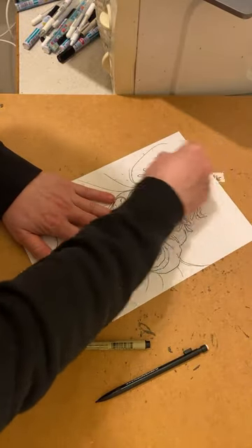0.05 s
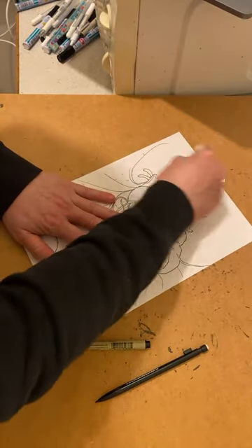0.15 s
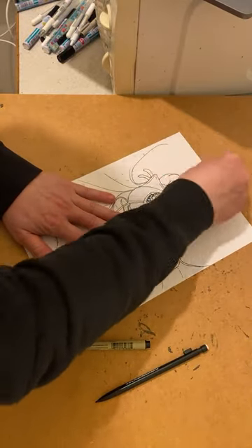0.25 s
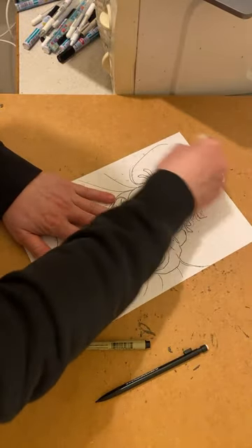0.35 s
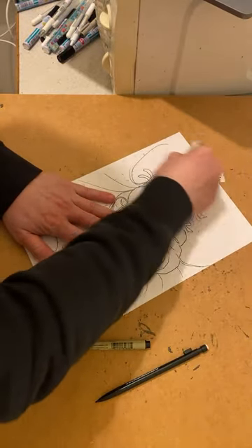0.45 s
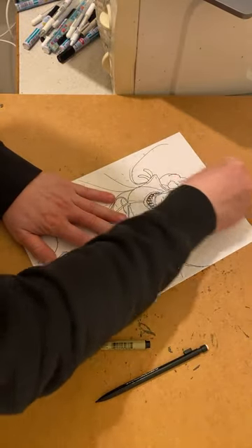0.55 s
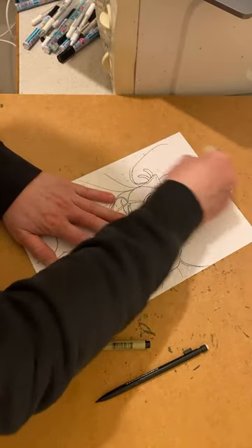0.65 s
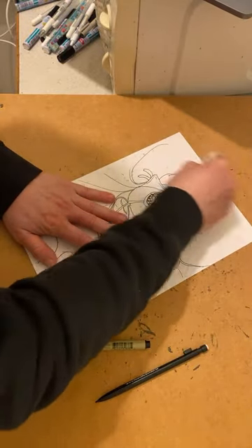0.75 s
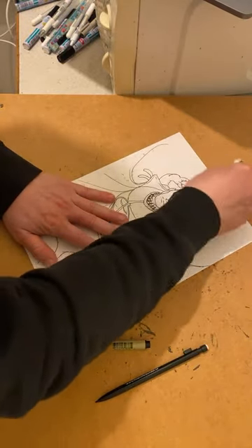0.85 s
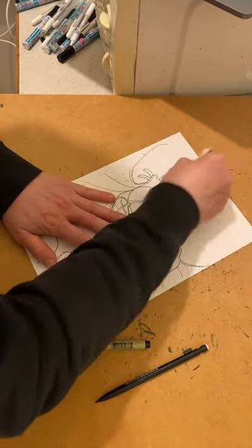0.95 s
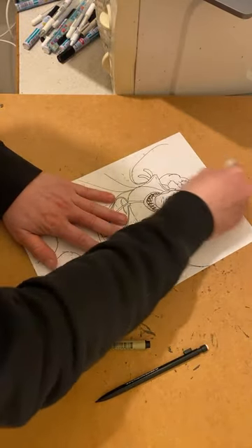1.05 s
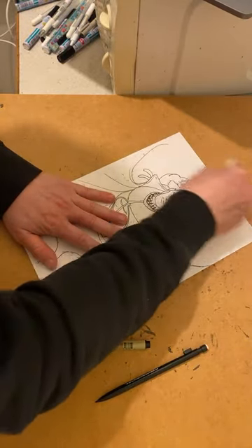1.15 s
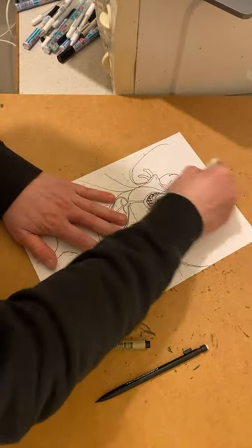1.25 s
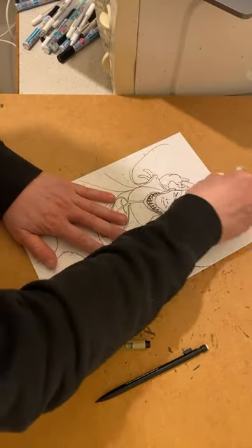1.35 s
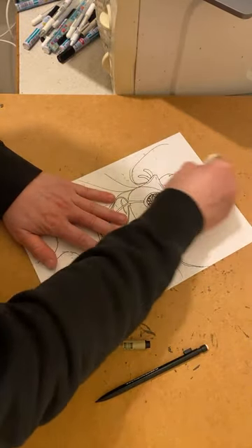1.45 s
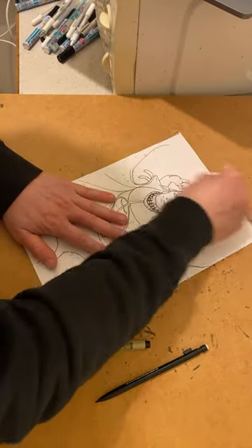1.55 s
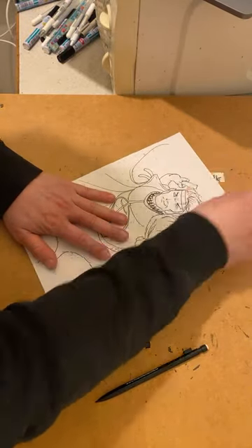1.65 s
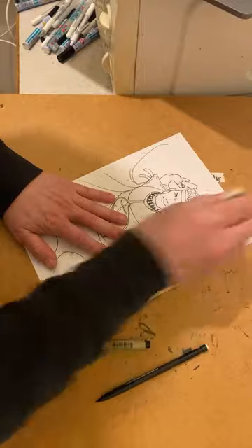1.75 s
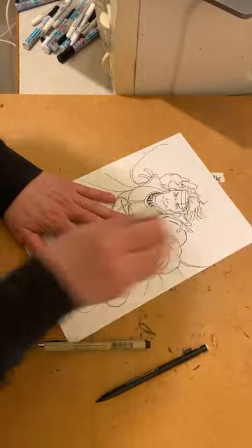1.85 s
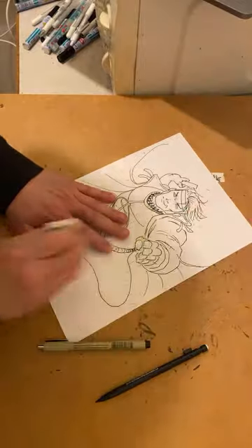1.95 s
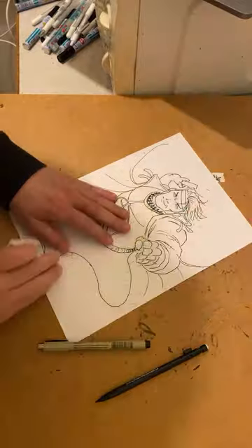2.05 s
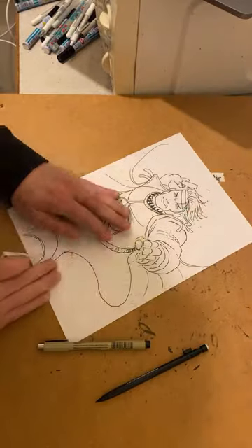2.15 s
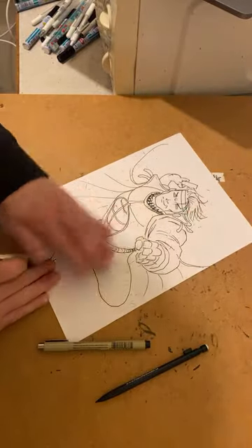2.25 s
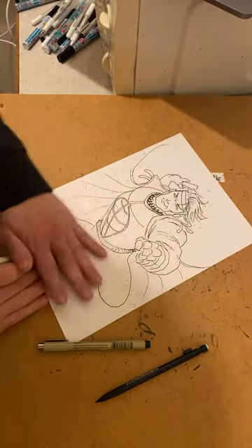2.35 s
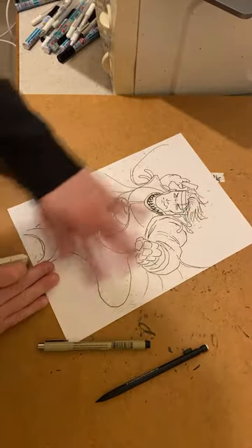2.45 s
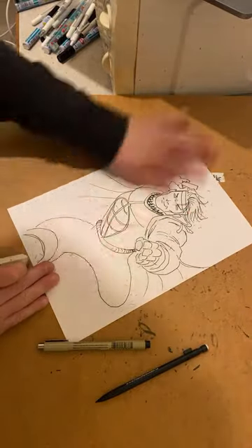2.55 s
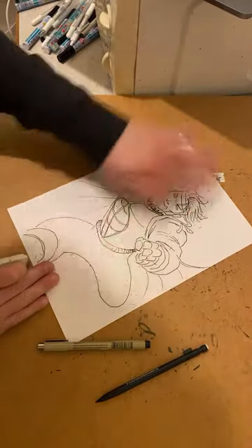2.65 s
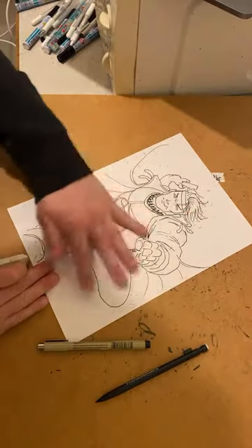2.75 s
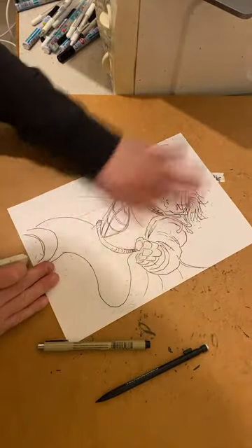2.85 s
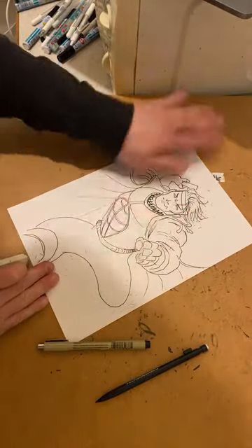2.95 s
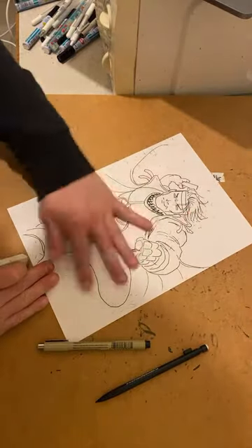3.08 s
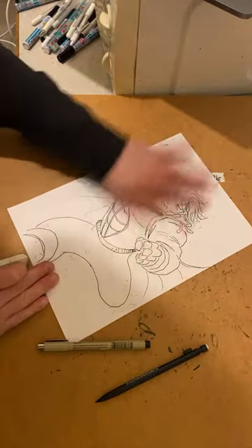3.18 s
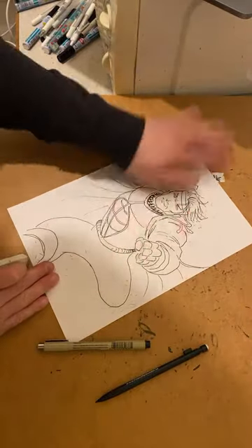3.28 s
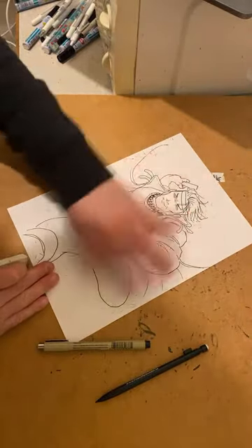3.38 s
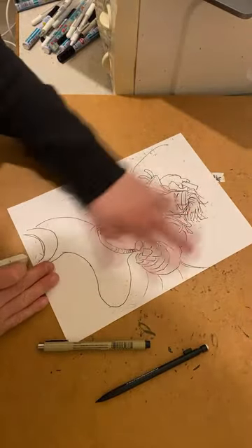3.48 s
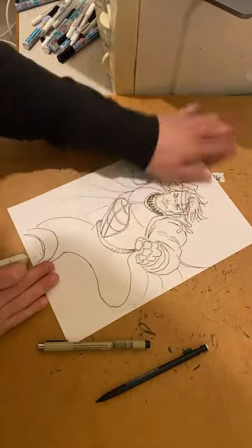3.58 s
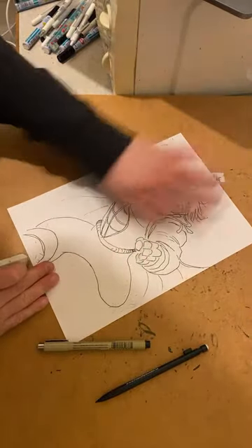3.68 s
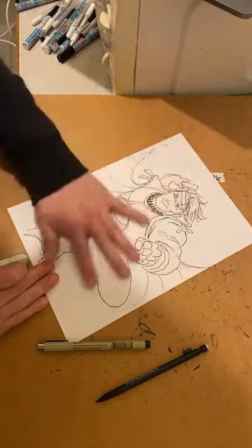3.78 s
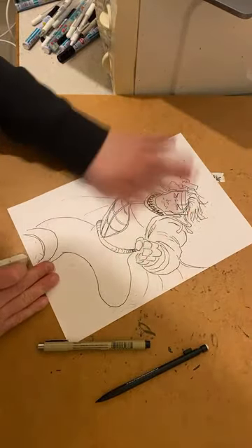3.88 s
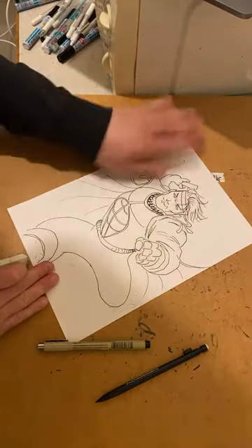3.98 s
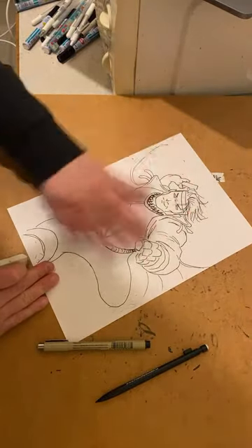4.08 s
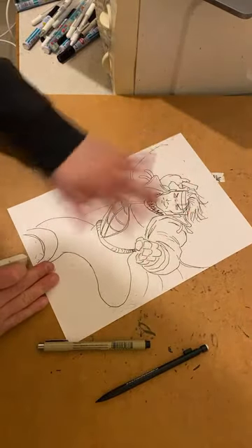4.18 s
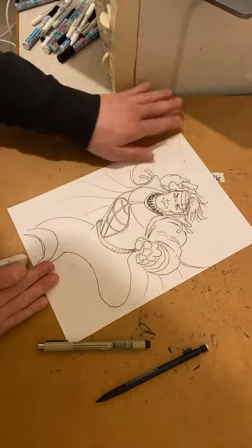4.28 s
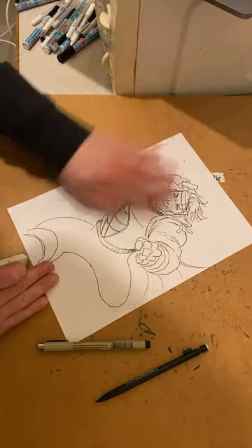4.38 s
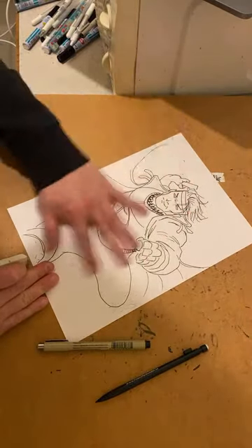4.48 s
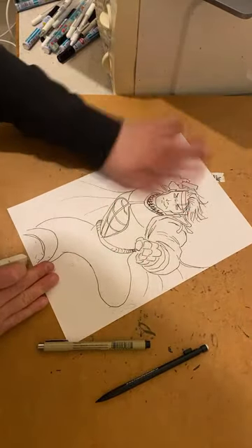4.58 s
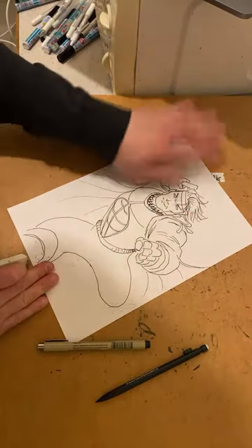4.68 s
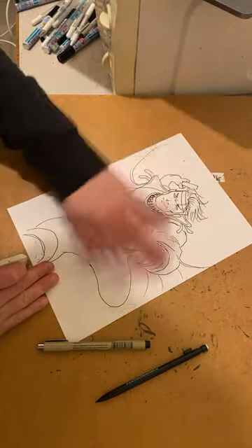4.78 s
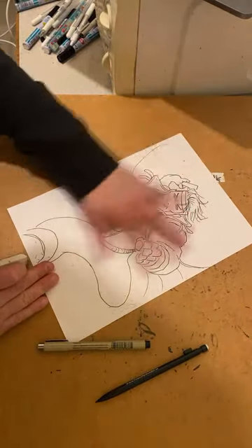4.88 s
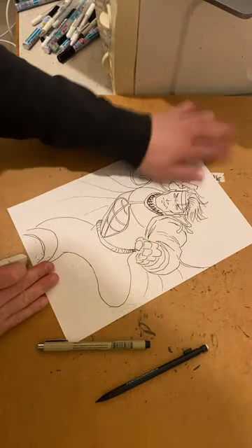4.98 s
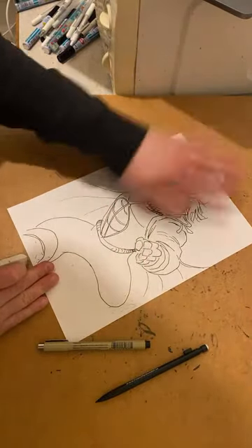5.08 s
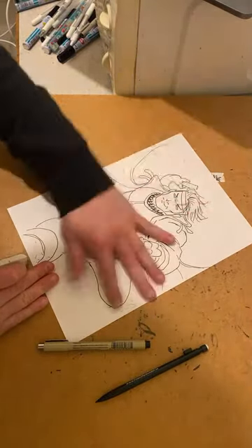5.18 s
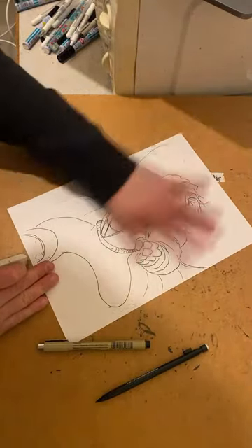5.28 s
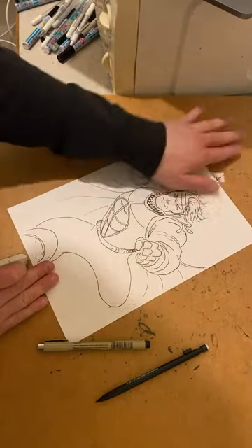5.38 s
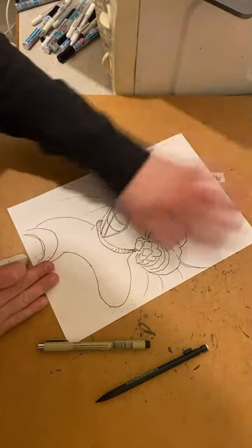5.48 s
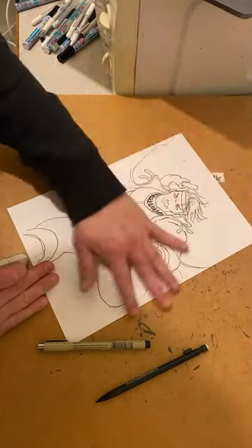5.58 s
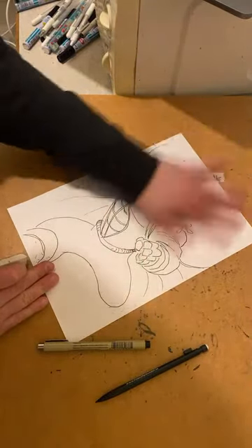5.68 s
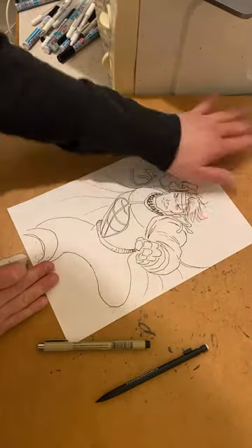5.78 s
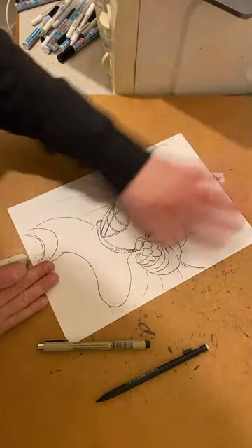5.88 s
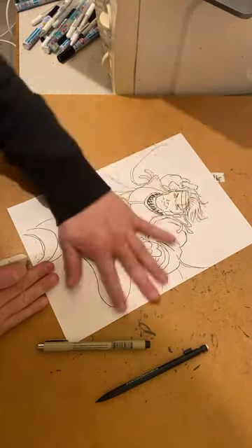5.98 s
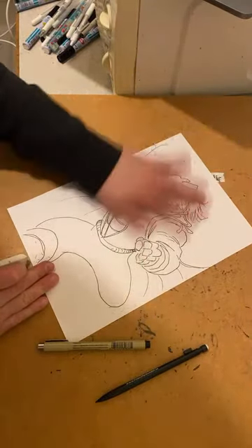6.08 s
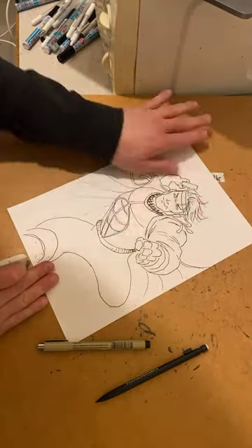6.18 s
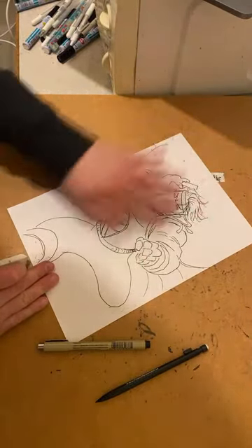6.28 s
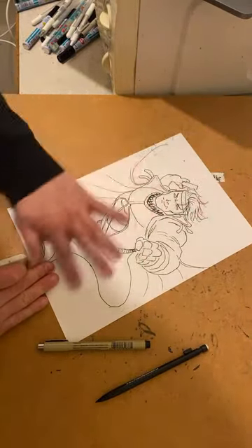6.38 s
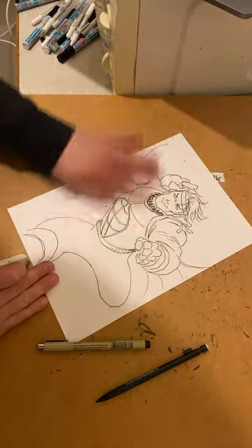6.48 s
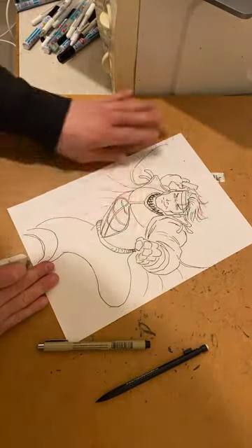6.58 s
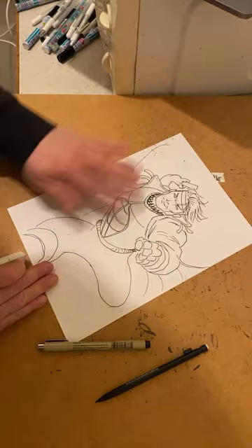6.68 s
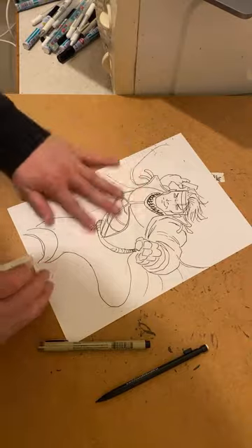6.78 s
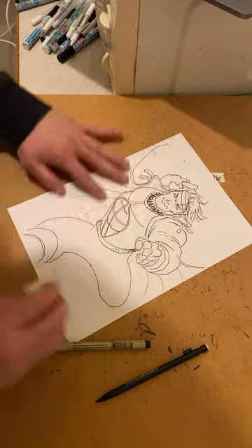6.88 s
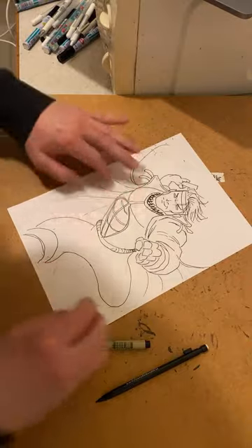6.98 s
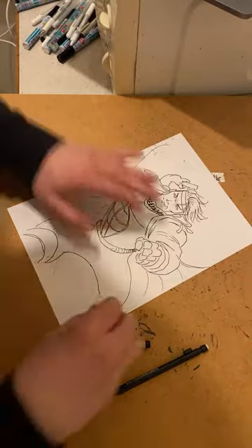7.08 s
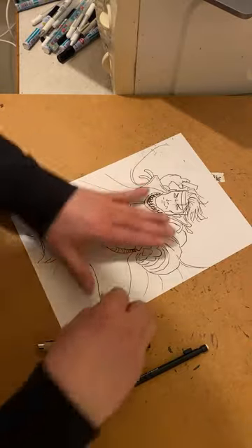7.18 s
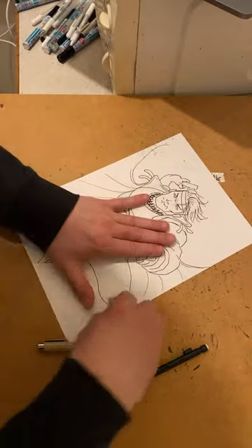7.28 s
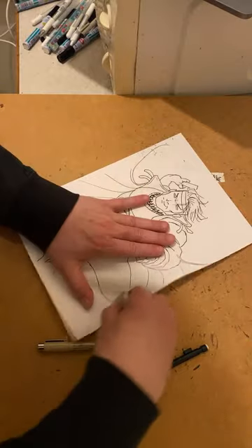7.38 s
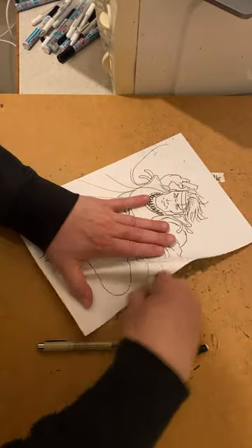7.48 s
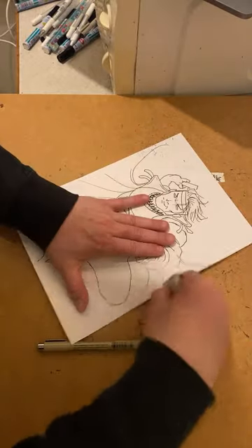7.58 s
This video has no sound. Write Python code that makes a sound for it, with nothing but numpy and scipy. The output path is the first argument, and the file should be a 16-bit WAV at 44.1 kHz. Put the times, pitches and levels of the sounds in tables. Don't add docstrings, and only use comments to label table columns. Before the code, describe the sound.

An eraser knocks hard and drags over paper on a hollow wooden desk six times, then a hand sweeps the sheet repeatedly and the paper crackles.

```python
import sys
import numpy as np
from scipy import signal
from scipy.fft import rfft, irfft, next_fast_len
from scipy.io import wavfile
from scipy.ndimage import uniform_filter1d

SR = 44100
rng = np.random.default_rng(int(sys.argv[2]) if len(sys.argv) > 2 else 0)


def to_wav(s):
    ch = np.atleast_2d(s).T
    pcm = np.round(np.clip(ch, -1, 1) * 32767)
    wavfile.write(sys.argv[1], SR, pcm.astype(np.int16))


def undo_db(level):
    steps = np.asarray(level, float) / 20
    return 10 ** steps


N = 336432

# (time [s], blow [dB], deep modes [dB], bright modes [dB], echo [dB])
RUBBER_BLOWS = [
    (0.124, -17, -26.5, -18.5, -2.5),
    (0.462, -18, -23.5, -17.5, -2.5),
    (0.749, -18, -26, -17, -3),
    (1.017, -14.5, -26, -14.5, -4),
    (1.267, -16.5, -26.5, -17.5, -4),
    (1.541, -19.5, -24, -18.5, -1.5),
]
# (time [s], blow [dB], deep modes [dB], bright modes [dB], echo [dB])
HAND_BLOWS = [(2.214, -52.5, -6, -24, 6.5), (2.825, -35, -11, -23, 3), (2.834, -30.5, -21, -30, -17),
              (3.131, -42.5, -26, -29, -8), (3.151, -36, -12, -26, -4), (3.483, -38, -8.5, -14, 4.5),
              (3.818, -30.5, -15.5, -17.5, -1), (4.178, -38.5, -10.5, -14.5, 0),
              (4.512, -49.5, -4.5, -17.5, 9.5), (4.879, -38.5, -13, -23.5, 4.5),
              (5.244, -43.5, -11.5, -18, 8.5), (5.275, -39.5, -10, -12, -0.5),
              (5.656, -37.5, -6.5, -14, -0.5), (6.028, -41, -5, -11.5, -21), (6.048, -36.5, -6, -16, 0.5),
              (6.425, -54, -0.5, -30, 9.5), (6.459, -46.5, -7, -8, -0.5), (6.81, -28.5, -19.5, -21.5, -3),
              (7.312, -49, -4.5, -16, 4), (7.349, -26.5, -25, -20, 0)]
# (frequency [Hz], level [dB], t60 [s])
BOARD_MODES = [(280.7, -5, 0.059), (337, 1, 0.064), (450, 0.5, 0.096), (547, -5.5, 0.049),
               (658, -14.5, 0.14)]
# (frequency [Hz], level [dB], t60 [s])
PALM_MODES = [(258, -7.5, 0.041), (313, 1.4, 0.077), (450.5, -2.5, 0.059), (587, -6.5, 0.041),
              (780, -3.5, 0.022)]


def landings():
    out = np.zeros(N + SR)
    usual_walls = tail()
    for s, *levels in RUBBER_BLOWS:
        walls = 0.7 * usual_walls + 0.7 * tail()
        knock = landing(*levels, BOARD_MODES, 1.2, 0.00006, walls)
        out[round((s - 0.0022) * SR):][:len(knock)] += knock
    for s, *levels in HAND_BLOWS:
        knock = landing(*levels, PALM_MODES, 1.0, 0.00192, tail())
        out[round((s - 0.003) * SR):][:len(knock)] += knock
    return colour(out, lambda hz: hz ** 2 / (hz ** 2 + 29.0 ** 2))[:N]


# (frequency [Hz], level [dB], t60 [s])
DEEP_MODES = [(86, -12, 0.18), (117.1, -10, 0.52), (155.3, -0.5, 0.13)]
# (frequency [Hz], level [dB], t60 [s])
BRIGHT_MODES = [(817, 2.5, 0.0098), (1160, 0.5, 0.016), (1337, -7, 0.026), (1484, 1.5, 0.011),
                (1770, -5.5, 0.012), (2237, 3.5, 0.0056), (2830, -6.5, 0.0074)]
# (delay [s], gain of the board's ring [1])
BOARD_ARRIVALS = [(.001, -.8), (.0078, -.82), (.0122, -.32), (.0156, .46), (.0213, 1.), (.0288, -.35),
                  (.0405, -.35)]
# (delay [s], gain [1])
EDGE_ARRIVALS = [(.002, .35), (.0074, -1.8), (.0102, -.32), (.0135, .25), (.0181, -.35), (.0218, -.3),
                 (.0249, -.25), (.0298, .3), (.037, -.2)]


def landing(db, deep_db, bright_db, echo_db, board, push_ms, scatter_s, walls):
    deep_push = pushes([(0.00081, 1)], 5.57, 0)
    deep = undo_db(deep_db + 23.0) * signal.fftconvolve(deep_push, rings(DEEP_MODES, 0.009))
    top = signal.fftconvolve(pushes(BOARD_ARRIVALS, push_ms, scatter_s), rings(board, 0.001))
    edge = undo_db(bright_db + 12) * rings(BRIGHT_MODES, 0.0006)
    bright = signal.fftconvolve(pushes(EDGE_ARRIVALS, 0.51, 0.0001 + scatter_s), edge)
    board_push = pushes([(0.00026, 0.91)], push_ms, 0)
    thud = undo_db(5.0) * signal.fftconvolve(board_push, rings(board, 0.0015, 0.38))
    thud += undo_db(3.5) * signal.fftconvolve(pushes([(0.00023, 0.98)], 0.36, 0), edge)
    far = signal.fftconvolve(undo_db(-3.0) * deep + thud, walls)[:len(top)]
    return undo_db(db - 4.5) * (deep + top + bright + undo_db(echo_db) * far)


def pushes(arrivals, ms, scatter_s):
    force = np.zeros(SR // 16)
    push = np.hanning(round(ms * SR / 1000) + 2)
    push /= push.sum()
    for (after, gain), chance in zip(arrivals, rng.standard_normal(len(arrivals))):
        moved = after + scatter_s * chance * (after > 0)
        force[abs(round(moved * SR)):][:len(push)] += gain * push
    return force


def rings(modes, rise_s, share=1):
    t = np.arange(SR // 2) / SR
    tones = np.zeros(len(t))
    for k, (hz, db, t60) in enumerate(modes):
        tones += (-1) ** k * undo_db(db - 60 * t / (share * t60)) * np.sin(2 * np.pi * hz * t)
    return tones * (1 - np.exp(-t / rise_s)) ** 2


# (time after the blow [s], level [dB])
ECHO_DECAY = [(0., -1), (.025, -2.5), (.05, -5), (.108, -11), (.114, -14), (.21, -22.5), (.225, -25.5),
              (.45, -42)]
# (frequency [Hz], level [dB])
ECHO_COLOUR = [(60, -34), (150, -1.2), (400, 2.6), (1200, 1), (3000, 0), (16000, -10)]


def tail():
    t = np.arange(round(ECHO_DECAY[-1][0] * SR)) / SR
    noise = colour(rng.standard_normal(SR // 2), lambda hz: undo_db(read(ECHO_COLOUR, hz)))[:len(t)]
    noise = noise * undo_db(np.interp(t, *np.transpose(ECHO_DECAY)))
    return noise / np.linalg.norm(noise)


# (frequency [Hz], density [dB per Hz])
HISS = [(2940, 5), (5000, 7), (13400, -2), (15100, -5.5), (16000, -7)]
# (frequency [Hz], width [Hz], level [dB])
SHEET_MODES = [(850, 8.6, 11), (1125, 11, 2.5), (1289, 14, 7.5), (1654, 160, -1), (2298, 11.7, -3)]


def friction(parts):
    hiss, _, rustle, drag = sum(gains for gains, fibres, steep in parts)

    def hiss_gain(hz):
        return undo_db(read(HISS, hz)) * hz ** 4 / (hz ** 4 + 7700.0 ** 4)

    def sheet_gain(hz):
        return humps(SHEET_MODES, 0.49)(hz) * hz ** 3 / (hz ** 3 + 700.0 ** 3)

    out = evened(colour(grit(1.7, 0.6), hiss_gain)) * undo_db(-1.0) * hiss
    catching = grit(1.0, 1.05)
    for gains, fibres, steep in parts:
        out += evened(colour(catching, humps(fibres, steep))) * gains[1]
    out += evened(colour(grit(2.2, 1.0), sheet_gain)) * undo_db(-3.0) * rustle
    desk = rings(DEEP_MODES, 0.011) * undo_db(11.0) + rings(PALM_MODES, 0.0013)
    desk += undo_db(-4.5) * rings(BRIGHT_MODES, 0.00079)
    shaken = signal.oaconvolve(grit(0.65, 1.8), desk)[:N]
    return out + evened(shaken) * drag


# (start [s], rise [s], top [dB], fade to 20 dB down [s], firmness of first touch [dB])
RUBS = [
    (.121, .125, -60.5, .145, -4),
    (.458, .095, -59, .165, 10),
    (.747, .09, -61.5, .125, -4),
    (1.015, .088, -60.5, .13, 0),
    (1.264, .088, -61, .125, -5),
]
# (start [s], rise [s], top [dB], fade [s], rumble of the desk [dB])
EARLIER_LANDING = [(-0.19, 0.11, -61.5, 0.15, 20.5)]
# (level at the top [dB], share of the swing followed [1], bite at first touch [dB])
RUB_MOTION = dict(catch_db=-22, bend=3.2, knee=1.8, bite_s=0.091, scrape=(1.4, 0.97, 3.1),
              rustle=(-34, .9, -33), drag=(3, 0.99, -25))
# (frequency [Hz], width [Hz], level [dB])
FIBRES = [(2650, 3100, 1.5), (4200, 3300, -1), (5200, 1450, -0.5)]


def rubber():
    gains = strokes(RUBS, RUB_MOTION, "touch") + strokes(EARLIER_LANDING, RUB_MOTION, "drag")
    return gains, FIBRES, 1.5


# (start [s], rise [s], top [dB], fade [s], firmness of first touch [dB])
SWEEPS = [(2.822, 0.074, -41, .13, -4.5), (3.124, 0.12, -43, .12, -11), (3.466, 0.1, -42.5, .14, -10),
          (3.81, 0.13, -47.5, 0.14, 8), (4.169, 0.083, -47, 0.16, -2.5), (4.5, .12, -47, .13, -3),
          (4.872, 0.098, -45, 0.14, -7.5), (5.234, 0.14, -44.5, 0.13, -3), (5.64, 0.097, -44, 0.13, -4),
          (6.017, 0.12, -47, .16, -1.5), (6.424, 0.078, -47, 0.16, -9), (6.802, .08, -55, 0.19, 10.5)]
# (start [s], rise [s], top [dB], fade [s], sheet rustle [dB])
GLIDE = [(2.365, 0.19, -41, 0.14, 0)]
SWEEP_MOTION = dict(catch_db=-16.5, bend=2.85, knee=1.3, bite_s=0.33, scrape=(-4, 0.94, -62.5),
                rustle=(-6, 1, -8), drag=(-16, 0.36, -12))
GLIDE_MOTION = dict(catch_db=-34, bend=1.66, knee=1.2, bite_s=0.078, scrape=(-5.5, 0.92, -43),
                rustle=(0.53, 1, -36), drag=(-20, 0.16, -30))


def hand():
    gains = strokes(SWEEPS, SWEEP_MOTION, "touch") + strokes(GLIDE, GLIDE_MOTION, "rustle")
    return gains, FIBRES, 1.0


# (start [s], rise [s], top [dB], fade [s], scrape [dB])
SKIDS = [
    (1.545, .085, -53.5, 0.1, 11),
    (1.92, 0.17, -60, 0.19, -2.5),
]
SKID_MOTION = dict(catch_db=-22.5, bend=1.04, knee=5.7, bite_s=.1, scrape=(0, 0.87, -12),
               rustle=(-9, 0.83, -30), drag=(1.5, .6, -28))
# (frequency [Hz], width [Hz], level [dB])
SKID_FIBRES = [(2950, 410, 2), (3640, 290, 2.5), (5100, 1200, 3.5), (6550, 2400, 0)]


def skid():
    return strokes(SKIDS, SKID_MOTION, "scrape"), SKID_FIBRES, 0.8


# (start [s], rise [s], top [dB], fade [s], rustle [dB])
BUCKLES = [
    (7.32, 0.02, -79.5, 0.052, 23),
    (7.402, 0.034, -53.5, 0.087, -7),
    (7.44, 0.023, -47, 0.11, 0),
    (7.5, 0.089, -56.5, 0.25, 4.5),
]
BUCKLE_MOTION = dict(catch_db=-23, bend=1.6, knee=1.1, bite_s=.1, scrape=(8.4, 0.97, -23),
                 rustle=(0, 0.31, -25), drag=(-32, .5, -22))
# (frequency [Hz], width [Hz], level [dB])
BUCKLE_FIBRES = [(1720, 340, -10), (2950, 400, 0.5), (4200, 600, 0), (5200, 570, -2), (6850, 1300, -5.5)]


def buckle():
    return strokes(BUCKLES, BUCKLE_MOTION, "rustle"), BUCKLE_FIBRES, 0.62


def strokes(rows, rule, own):
    gains = np.zeros((4, N))
    for start, rise, top_db, fade, own_db in rows:
        first = max(round(start * SR), 0)
        t = np.arange(first, min(first + SR * 3 // 4, N)) / SR - start
        touch_db = own_db * (own == "touch")
        climb_db = np.minimum(rule["catch_db"] + touch_db, 0) * np.maximum(1 - t / rise, 0) ** rule["bend"]
        late = np.maximum(t - rise, 0) / fade
        fall_db = 20 * late ** 2 * (1 + rule["knee"]) / (1 + rule["knee"] * late)
        swing_db = climb_db - fall_db
        layers = [undo_db(swing_db)]
        for name in ("scrape", "rustle", "drag"):
            db, share, bite_db = rule[name]
            moving = undo_db(db + own_db * (name == own) + share * swing_db)
            bite = undo_db(bite_db + touch_db - 60 * t / rule["bite_s"])
            layers.append(moving + bite)
        settle = np.minimum(t / 0.0048, 1)
        gains[:, first:first + len(t)] += undo_db(top_db) * np.array(layers) * settle
    return uniform_filter1d(gains, size=130, axis=1)


def grit(spread_db, flutter_db):
    wander = uniform_filter1d(rng.standard_normal(N), size=500)
    pressure = evened(uniform_filter1d(wander, size=500))
    return rng.standard_normal(N) * undo_db(spread_db * rng.exponential(1, N) + flutter_db * pressure)


def patchy(x, patchy_db):
    z = signal.stft(x, nperseg=512)[2]
    patches = uniform_filter1d(rng.standard_normal(z.shape), size=5, axis=0)
    patches = evened(uniform_filter1d(patches, size=8, axis=1))
    return signal.istft(z * undo_db(patchy_db * patches), nperseg=512)[1][:N]


# (time [s], peak [dB], pitch [Hz], t60 [s])
SNAPS = [(2.004, -54, 1294, 0.16), (2.02, -54.5, 780, 0.18), (2.06, -66, 1520, 0.34),
         (7.2, -64, 2320, 0.031), (7.21, -64, 1500, .08), (7.197, -56, 1223, 0.069),
         (7.203, -61, 1816, 0.047), (7.323, -54, 8900, 0.0032), (7.415, -42, 3870, .01),
         (7.449, -34, 4200, 0.028), (7.45, -43, 5200, 0.028), (7.456, -35.5, 2950, 0.074),
         (7.461, -28, 5200, 0.0063), (7.469, -33, 3380, 0.011), (7.483, -33, 5100, 0.022),
         (7.503, -41, 3960, 0.021)]


def snaps():
    out = np.zeros(N + SR)
    t = np.arange(6000) / SR
    for s, db, hz, t60 in SNAPS:
        waver = np.cumsum(uniform_filter1d(rng.standard_normal(len(t)), size=30)) * 0.11
        burst = undo_db(db - 60 * t / t60) * np.sin(2 * np.pi * hz * t + waver)
        out[round(s * SR):][:len(t)] += burst * np.minimum(t * hz, 1)
    return out[:N]


def reflected(rubbing):
    far = signal.oaconvolve(rubbing, tail())[:N]
    return colour(far, lambda hz: 1 / np.sqrt(1 + (hz / 7000.0) ** 4))


# (frequency [Hz], density [dB per Hz])
AIR = [(30, -60), (62, -8), (125, -7), (221, -10), (540, -12.5), (720, -18.5), (11700, -38.5), (16000, -47)]
# (frequency [Hz], level [dB])
HUM = [(48.4, -71), (150.7, -63.5), (236.9, -77.5)]


def room():
    t = np.arange(N) / SR
    out = undo_db(-64) * evened(colour(rng.standard_normal(N), lambda hz: undo_db(read(AIR, hz))))
    for hz, db in HUM:
        waver = evened(uniform_filter1d(rng.standard_normal(N), size=6000))
        out += undo_db(db + 1.6 * waver) * np.sin(2 * np.pi * hz * t)
    return out


def evened(x):
    return x / np.sqrt(np.mean(x ** 2) + 1e-20)


def read(points, hz):
    f, value = np.transpose(points)
    return np.interp(np.log(hz + 1), np.log(f + 1), value)


def colour(x, gain):
    size = next_fast_len(len(x))
    return irfft(rfft(x, size) * gain(np.fft.rfftfreq(size, 1 / SR)), size)[:len(x)]


def humps(peaks, steep):
    def gain(hz):
        power = sum(undo_db(2 * db) / (1 + (2 * (hz - f) / w) ** 2) ** steep for f, w, db in peaks)
        return np.sqrt(power)
    return gain


def scene():
    rubbing = friction([rubber(), hand(), skid(), buckle()])
    rubbing = patchy(rubbing, patchy_db=1.5) + snaps() * undo_db(2.0)
    mono = landings() + rubbing + undo_db(-13.0) * reflected(rubbing) + room()
    return np.array([mono, mono])


# (time [s], level [dB])
JUMPS = [
    (1.5442, -21.5),
]


def jumps():
    t = np.arange(N) / SR
    out = np.zeros(N)
    for s, db in JUMPS:
        leak = np.exp(-np.maximum(t - s, 0) / 0.0018)
        out -= undo_db(db) * (t >= s) * leak * np.clip((t - s) / 0.00007, 0, 1)
    return out


# (start [s], end [s])
GAPS = [(.7950, .7975), (1.5136, 1.5246), (2.0337, 2.0365), (3.8536, 3.8626), (6.3137, 6.3195)]


def lost_blocks(mono):
    t = np.arange(N) / SR
    for start, end in GAPS:
        mono = mono * np.clip(np.maximum(start - t, t - end) / 0.00048, 0, 1)
    return mono


# (time [s], low edge [Hz], high edge [Hz])
FILLS = [(.56, 7500, 9000), (.56, 11700, 14000), (1.13, 4200, 5800), (2.14, 9600, 11800),
         (2.14, 5200, 6500), (2.885, 8200, 12600), (3.56, 4200, 5800), (3.56, 7500, 9000),
         (3.57, 11000, 12600), (3.885, 4200, 6000), (3.885, 9000, 12800), (3.98, 13700, 15300),
         (4.585, 5200, 6500), (5.725, 7500, 9000), (6.87, 4200, 5800)]


def filled_bands(mono):
    hz, frames, z = signal.stft(mono, SR, nperseg=1024)
    mask = np.zeros(z.shape)
    for s, low, high in FILLS:
        mask += (abs(frames - s) < 0.016) * ((hz > low) & (hz < high))[:, None]
    scattered = abs(z) * mask * np.exp(2j * np.pi * rng.random(z.shape))
    side = signal.istft(scattered, SR, nperseg=1024)[1][:N]
    return np.array([mono + 0.67 * side, mono - 0.68 * side])


def band_limit(x):
    return signal.sosfilt(signal.butter(12, 16550, fs=SR, output="sos"), x)


def record(dry):
    mono = dry[0] + jumps()
    mono = colour(mono, lambda hz: 1 / (1 + (hz / 15850) ** 200))
    mix = filled_bands(lost_blocks(mono))
    return band_limit(mix)


dry = scene()
out = record(dry)
to_wav(out)
```